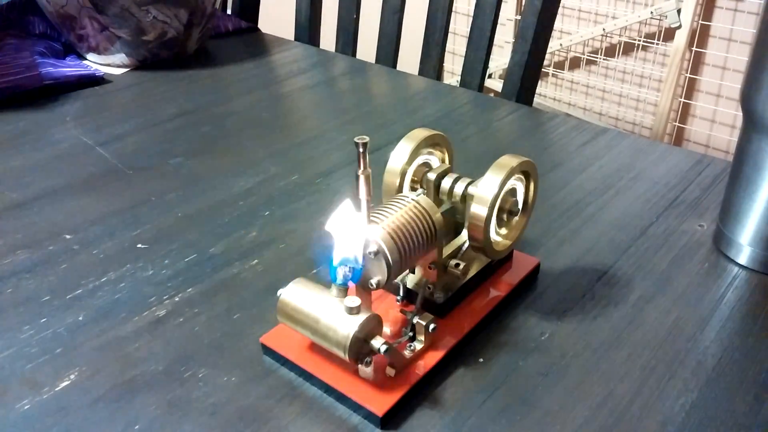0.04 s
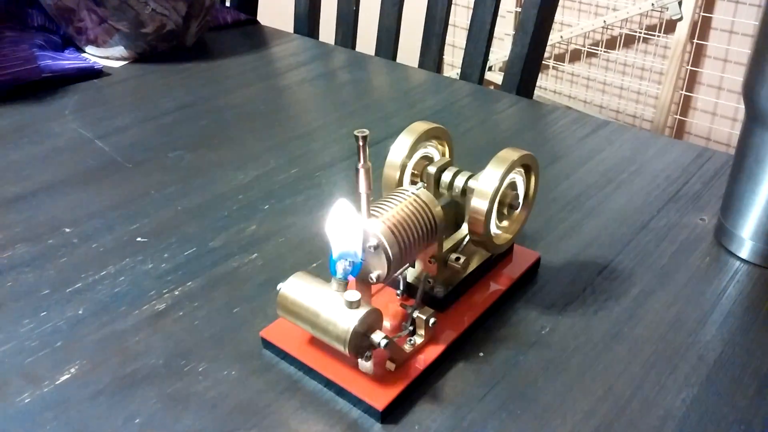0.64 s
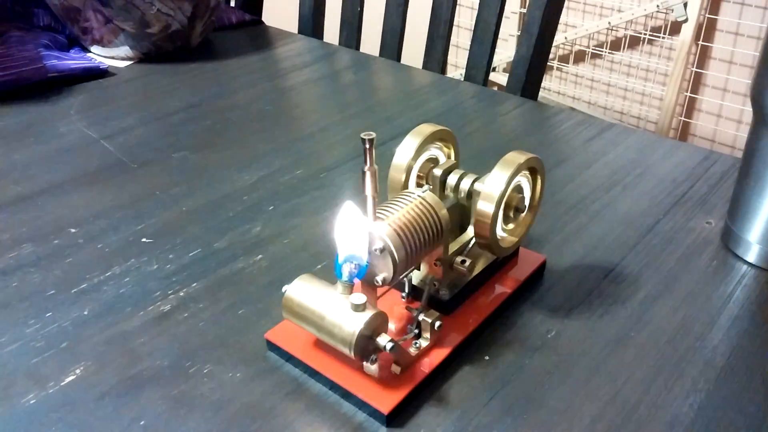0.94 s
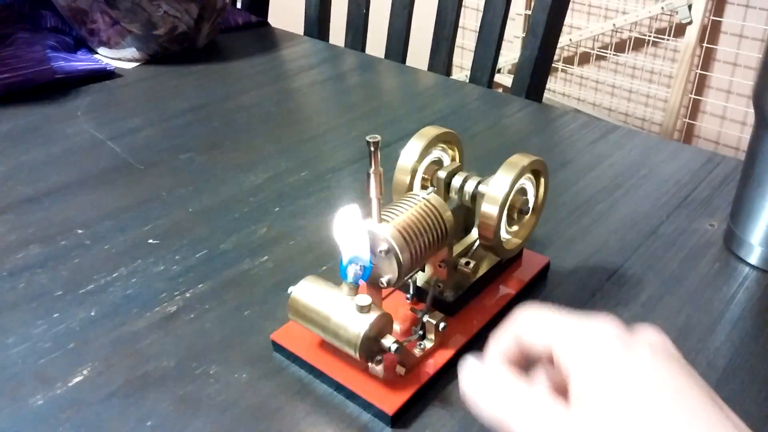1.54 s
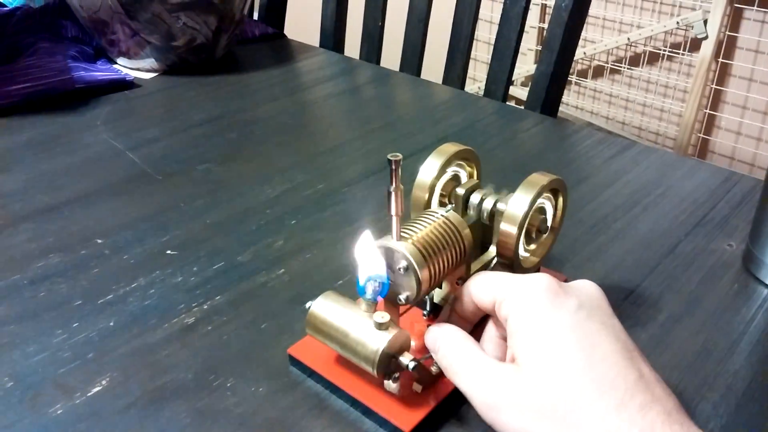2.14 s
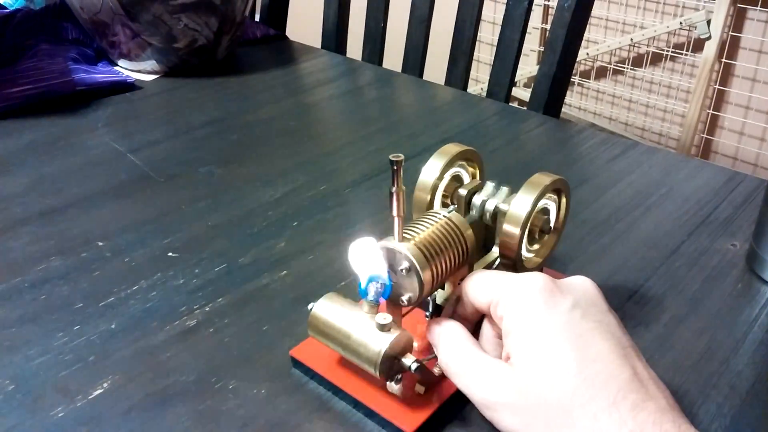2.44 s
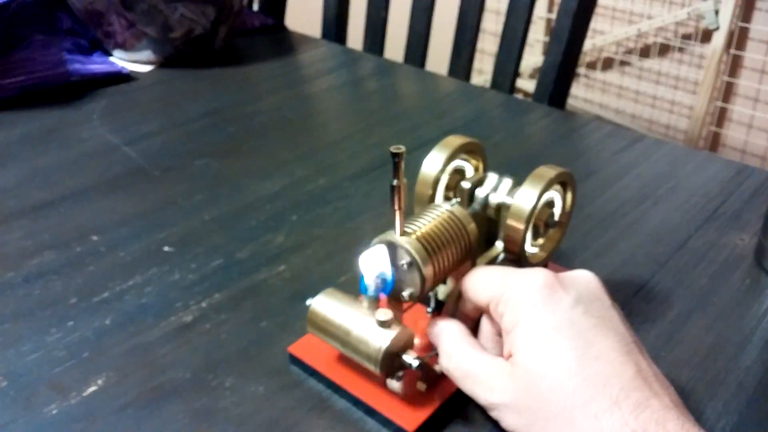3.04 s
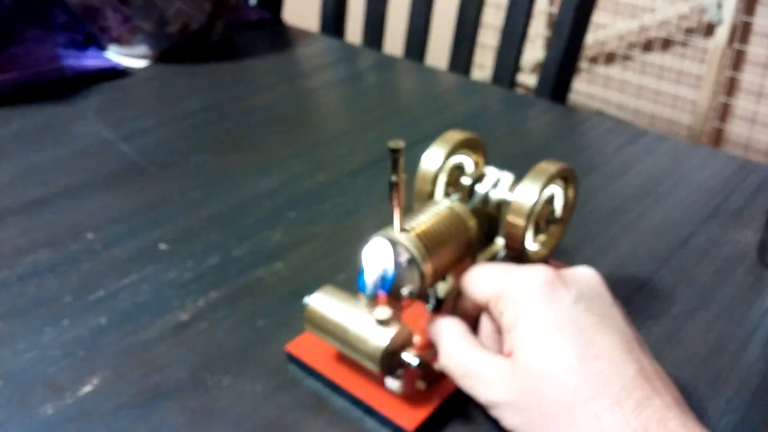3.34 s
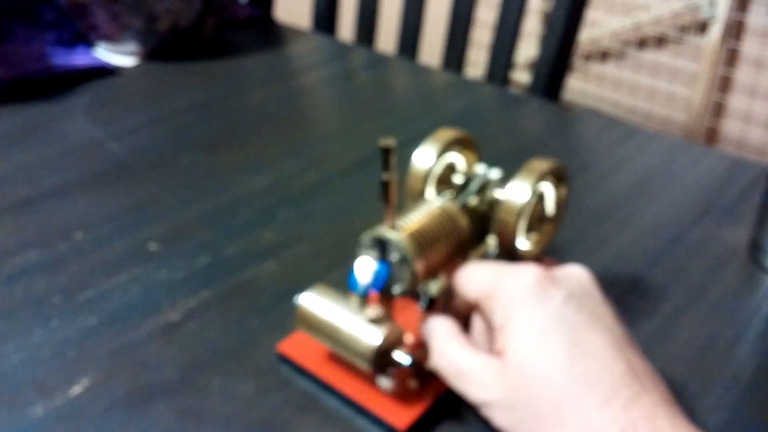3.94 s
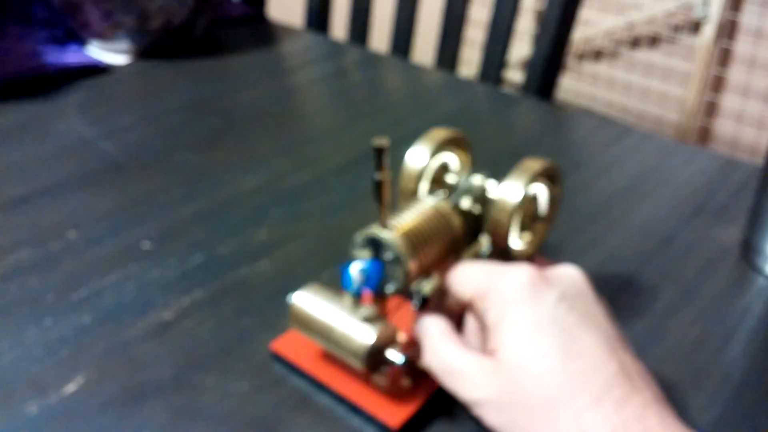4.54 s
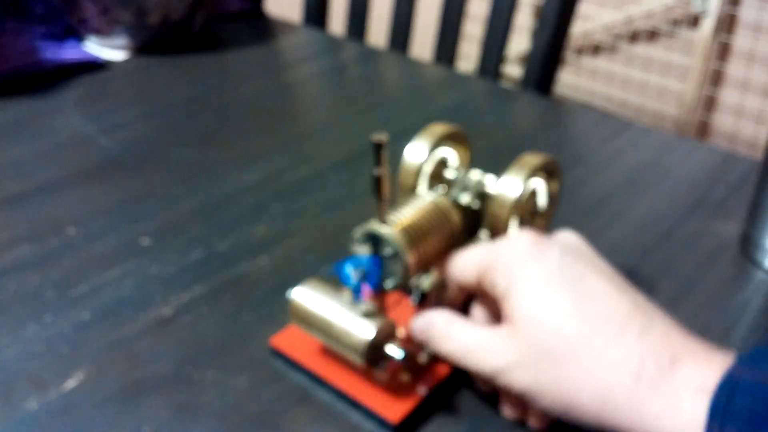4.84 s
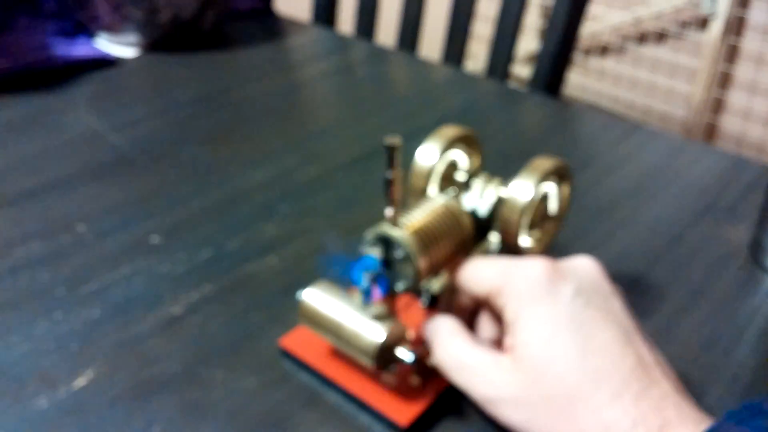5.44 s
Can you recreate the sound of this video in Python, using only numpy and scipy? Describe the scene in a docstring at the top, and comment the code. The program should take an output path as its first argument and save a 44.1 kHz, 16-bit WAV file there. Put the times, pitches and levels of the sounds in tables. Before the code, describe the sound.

A small flame-driven model engine runs close by on a wooden table for the whole clip, nearly six seconds, holding about six and a half turns a second. Each turn opens with a light knock, followed by faint piston ticks and clinking links, a very short, high, falling squeak, and a rasp of gas ending in a shutter click. The knocks make the base and table resonate in a low hum, while the brass cylinder adds a slight metallic ring. Harder clacks stand out at about 0.3, 2.0, 3.5 and 5.4 seconds. Sharper squeaks come near 0.2 and 0.8 seconds, cluster between 1.6 and 2.4 and between 3.0 and 3.6, and return around 4.0, 4.7 and 5.4. The room is small, with little reverberation. Faint room air lies underneath, with a barely audible thin, high whine that fades by 2 seconds and returns at 4.

```python
"""In a small room, on a wooden table, a model flame-eater engine runs close by at about 6.5 turns a second.
Each turn opens with a knock that excites the normal modes of base, table and brass cylinder. The piston
slides with faint ticks while loose links clink; stick-slip friction gives a short falling squeak; then
a rasp of gas ends in the click of the flame shutter. Faint room air and a thin whine lie underneath,
and an expander turns the quiet gaps down."""
import sys
import numpy as np
from scipy import signal
from scipy.fft import rfft, irfft, next_fast_len
from scipy.io import wavfile
from scipy.ndimage import uniform_filter1d

SR = 44100
rng = np.random.default_rng(int(sys.argv[2]) if len(sys.argv) > 2 else 0)


def file_out(sig):
    """Save sig as 16-bit WAV at sys.argv[1]."""
    # one column per channel
    cols = np.atleast_2d(sig).T
    # limit, then scale
    lim = np.clip(cols, -1, 1)
    pcm = np.round(lim * 32767).astype(np.int16)
    wavfile.write(sys.argv[1], SR, pcm)


N = 250701
RING_TIME = np.arange(SR // 2) / SR  # time axis of an impulse response, in seconds


def undb(db):
    """Amplitude grows tenfold for every 20 dB."""
    return 10 ** (np.asarray(db) / 20)


def along(times, curve):
    """Linear interpolation between (time, value) points."""
    return np.interp(times, *np.transpose(curve))


def noise(size=N):
    """White noise, uncorrelated between left and right."""
    return rng.standard_normal((2, size))


def gritty(spread_db, grain_hz):
    """Random amplitude modulation: noise whose strength jumps from grain to grain."""
    grain = (np.arange(N) * grain_hz / SR).astype(int)
    gain = undb(spread_db * rng.standard_normal(N)[grain])
    return noise() * gain / np.sqrt(np.mean(gain ** 2))


def colour(x, points):
    """Spectral shaping by a curve of (Hz, dB) points."""
    hz, db = np.transpose(points)
    size = next_fast_len(N + 8192)
    bins_hz = np.maximum(np.fft.rfftfreq(size, 1 / SR), 1)
    gain = undb(np.interp(np.log(bins_hz), np.log(hz), db))
    return irfft(rfft(x, size) * gain, size)[..., :N]


def cut(x, hz, kind, order=2):
    """A maximally flat low-pass or high-pass filter."""
    return signal.sosfilt(signal.butter(order, hz, kind, fs=SR, output="sos"), x)


def blows(times, db):
    """Brief impacts idealised as impulses."""
    out = np.zeros(N)
    np.add.at(out, np.clip(np.round(times * SR).astype(int), 0, N - 1), undb(db))
    return out


def ring(x, response):
    """A linear system convolves its input with its impulse response."""
    return signal.fftconvolve(np.atleast_2d(x), np.atleast_2d(response), axes=1)[:, :N]


def fade(t60_s):
    """Damping: an exponential decay that loses 60 dB in the time T60."""
    return np.exp(-np.log(1000) * RING_TIME / t60_s)


def swell(rise_s, fall_s):
    """A raised-cosine rise and fall."""
    t = np.arange(int((rise_s + fall_s) * SR)) / SR
    return np.sin(np.pi / 2 * np.interp(t, [0, rise_s, rise_s + fall_s], [0, 1, 0])) ** 2


# Spectrum of the room air. Each row: frequency in Hz, relative level in dB.
AIR_SPECTRUM = [(20, 2.5), (60, -19), (120, -1), (300, -14), (1000, -13), (3000, -3.5), (10000, -60),
                (16000, -73)]
# Course of the whine. Each row: time in seconds, frequency in Hz, level in dB.
WHINE_COURSE = [(0, 10430, -70.5), (1.6, 10370, -76), (2.0, 9900, -87), (3.92, 10470, -99),
                (4.02, 10400, -69), (5.68, 10570, -74)]


def background(waver_hz=25):
    """Room air is broadband noise; a thin whine wavers by random frequency modulation."""
    times, *columns = np.transpose(WHINE_COURSE)
    hz, db = (np.interp(np.arange(N) / SR, times, column) for column in columns)
    mid, side = colour(noise(), AIR_SPECTRUM)
    air = mid + undb(-4.5) * side * np.array([[1], [-1]])
    waver = cut(rng.standard_normal(N), 30, "low")
    whine = undb(db) * np.sin(2 * np.pi * np.cumsum(hz + waver_hz * waver / waver.std()) / SR)
    return undb(-47) * air + whine


# Speed of the flywheels. Each row: time in seconds, speed in turns per second.
FLYWHEEL_SPEED = [(0.0, 6.643), (0.7, 6.563), (1.6, 6.632), (2.0, 6.623), (2.45, 6.367), (2.75, 6.608),
                  (3.35, 6.559), (3.6, 6.423), (4.0, 6.499), (4.5, 6.485), (5.0, 6.433), (5.68, 6.501)]
SQUEAK_TURN, SHUTTER_TURN = 0.417, 0.603  # fractions of a turn after the knock


def turn_times(share=0, first_knock_s=0.016):
    """Angle is the integral of speed: the times at which the crank passes a given share of each turn."""
    t = np.arange(N) / SR
    turns = np.cumsum(along(t, FLYWHEEL_SPEED)) / SR
    count = int(turns[-1] - SHUTTER_TURN) + 1
    return first_knock_s + np.interp(np.arange(count) + share, turns, t)


# Knocks harder or softer than usual. Each row: time in seconds, extra force in dB.
UNEVEN_KNOCKS = [(0.317, 9), (0.622, -0.5), (0.774, 3.5), (0.926, -8), (1.682, -10.5), (1.834, 1.5),
                 (1.984, 13), (2.136, 6.5), (3.057, 6), (3.362, 4.5), (3.514, 12), (3.67, -4), (4.134, -10),
                 (4.751, -16), (5.061, -8), (5.216, -8), (5.371, 7)]


def strokes(scatter_db=0.1):
    """Quasi-periodic excitation, one knock a turn. Returns times and extra force in dB."""
    times = turn_times()
    force_db = -scatter_db * rng.standard_normal(len(times))
    for when, db in UNEVEN_KNOCKS:
        force_db[np.argmin(np.abs(times - when))] = db
    return times, force_db


# Thump of a blow on the base. Each row: time in seconds, level in dB at ordinary force.
THUMP_LEVEL = [(0, -39), (1.35, -39), (1.55, -39), (2.0, -39.5), (2.9, -39), (3.1, -38.5), (3.7, -39.5),
               (4.3, -37), (4.6, -41), (5.05, -40.5), (5.37, -37), (5.68, -38)]
# Spectrum of metal ticking and rubbing. Each row: frequency in Hz, gain in dB.
METAL_SPECTRUM = [(300, 5), (1100, 13.5), (1800, -9.5), (2700, 19), (3300, 12), (4200, 2), (6500, 3),
                  (10000, -0.5), (12000, -6), (16000, -7.5)]


def knocks(times, force_db, stir_db, split_hz=540, jolt_hz=880, heave_hz=340):
    """Impact: soft contact drives low modes, hard contact high ones. Returns sound and push on the base."""
    hard = blows(times, -40 + force_db)
    soft = blows(times, along(times, THUMP_LEVEL) + 0.23 * force_db)
    push = cut(soft, split_hz, "low", order=4) + undb(-6.5) * cut(hard, split_hz, "high", order=4)
    # the clack is a tight jolt with a short heave under it
    jolt = undb(4) * fade(0.0095) * np.sin(2 * np.pi * jolt_hz * RING_TIME)
    heave = undb(-4) * fade(0.03) * np.sin(2 * np.pi * heave_hz * RING_TIME)
    clack = cut(cut(ring(hard, jolt + heave), 213, "high"), 1460, "low", order=4)
    tick_envelope = ring(blows(times, -54.5 + 2 * stir_db), fade(0.057))
    return clack + colour(noise() * tick_envelope, METAL_SPECTRUM), push


# Modes of the base on the table. Each row: frequency in Hz, relative level in dB, T60 in seconds.
BASE_MODES = [(76, -12.5, 0.12), (108.17, -8, 0.49), (126.14, -6, 0.32), (172.4, -12, 0.23),
              (220.5, -10.5, 0.14), (241.3, -24.5, 0.62), (305.4, 5, 0.041), (357.5, -1, 0.11),
              (361, -2.5, 0.25), (379.3, -7, 0.048), (448, -23, 0.45), (685, -24.5, 0.052),
              (702, -4, 0.015), (814, -5.5, 0.061), (920, -0.5, 0.0056), (1000, -13.5, 0.048),
              (1058, -8.5, 0.17), (1071, -4, 0.079), (1127, -5, 0.016), (1464, -26.5, 0.33)]


def base_and_table(push, times, build_cycles=0.41, scatter_db=3):
    """Modal superposition: each mode builds up in about a cycle and takes a varying share of each blow."""
    out = 0
    for k, (hz, db, t60) in enumerate(BASE_MODES):
        build_up = 1 - np.exp(-RING_TIME * hz / build_cycles)
        mode = fade(t60) * np.sin(2 * np.pi * hz * RING_TIME) * build_up
        share_db = scatter_db * np.interp(np.arange(N) / SR, times, rng.standard_normal(len(times)))
        out = out + (-1) ** k * ring(push * undb(db + share_db), mode)
    return out


# Modes of the cylinder and its fins. Each row: frequency in Hz, gain at resonance in dB, T60 in seconds.
CYLINDER_MODES = [(1734, -4.5, 0.047), (2110, 4.5, 0.033), (2279.6, 14.5, 0.32), (2580, -25, 0.071),
                  (3262, 2, 0.015), (4052, 8, 0.08), (4970, 1.5, 0.02), (5950, -27, 0.042),
                  (5935, -1, 0.018), (6690, -0.5, 0.027)]


def brass_cylinder(x):
    """Resonance: whatever rubs or ticks also rings the cylinder, which adds to the direct sound."""
    response = sum(undb(db) * 2 * fade(t60) / fade(t60).sum() * np.cos(2 * np.pi * hz * RING_TIME)
                   for hz, db, t60 in CYLINDER_MODES)
    return x + ring(x, response)


# Play in the linkage. Each row: delay after the knock in seconds, relative level in dB.
LINKAGE_RATTLE = [(.021, -64), (.042, -61)]


def piston(times, stir_db, slide_db=-62, slack_s=0.0025, scatter_db=1.46):
    """Friction noise: the piston slides after each knock, and backlash rattles the linkage twice."""
    slide = ring(blows(times, slide_db + stir_db), swell(0.0056, 0.15))
    late, force = rng.standard_normal((len(times), len(LINKAGE_RATTLE), 2)).T
    contacts = sum(blows(times + delay + slack_s * late[k], db + scatter_db * force[k])
                   for k, (delay, db) in enumerate(LINKAGE_RATTLE))
    rattle = ring(contacts, swell(0.0046, 0.0019))
    return colour(gritty(spread_db=3.8, grain_hz=600) * (slide + rattle), METAL_SPECTRUM)


# Modes of the small links. Each row: frequency in Hz, relative level in dB, T60 in seconds.
LINK_MODES = [(3700, 9, 0.032), (5570, 7, 0.025), (6000, -25, 0.025), (7700, -11, 0.019)]


def clinks(times, stir_db, count=2, stroke_s=0.055, level_db=-62, spread_db=4):
    """Free vibration: loose links collide at random moments of a stroke, each clink ringing one mode."""
    attack = np.minimum(RING_TIME / 0.00091, 1)
    out = 0
    for hz, db, t60 in LINK_MODES:
        hits = times[:, None] + stroke_s * rng.random((len(times), count))
        force_db = level_db + db + stir_db[:, None] + spread_db * rng.standard_normal(hits.shape)
        # each mode radiates its own way, so left and right differ in phase
        mode = fade(t60) * np.sin(2 * np.pi * (hz * RING_TIME + rng.random((2, 1)))) * attack
        out = out + ring(blows(hits.ravel(), force_db.ravel()), mode)
    return out


# The light squeaks of ordinary turns. Each row: time in seconds, relative level in dB.
LIGHT_SQUEAK_LEVEL = [(0, -32), (0.5, -26.5), (1.0, -28.5), (1.45, -25), (1.75, -32), (2.5, -25),
                      (2.67, -36), (2.85, -26.5), (4.8, -29), (5.0, -35), (5.599, -24)]
# The loud squeaks. Each row: start in seconds, relative level in dB, decay time in seconds, starting
# pitch in Hz, second grip's relative level in dB, roughness from 0 to 1, second grip's delay in seconds.
LOUD_SQUEAKS = [(0.2251, -20, 0.0059, 3047, -39, 0.55, 0.011),
                (0.8362, -20.5, 0.0035, 2970, -34.5, 0.4, .02),
                (1.1412, -27, 0.0048, 2924, -31.5, 0.23, 0.0057),
                (1.5938, -22, 0.0047, 2993, -38, 0, 0.012), (1.8925, -14.5, 0.011, 3350, -46, 0.14, .007),
                (2.0471, -23, 0.004, 2853, -26, 0.63, 0.012),
                (2.2006, -14.5, 0.0013, 3093, -27, 0.15, .0065),
                (2.353, -22.5, 0.0029, 3080, -32, 0.11, 0.011), (2.968, -16, 0.0031, 2977, -47, 0.08, .011),
                (3.2699, -24, 0.0048, 3116, -30.5, 0.39, .011),
                (3.421, -21.5, 0.0053, 3158, -14.5, 0.18, .011),
                (3.5781, -18, 0.0024, 2833, -28, 0.29, 0.0056),
                (4.04, -22.5, 0.011, 2980, -31.5, 0.44, 0.013),
                (4.5034, -29, 0.019, 3137, -36.5, 0.45, 0.028),
                (4.6556, -20, 0.0076, 2990, -40.5, 0.19, .018),
                (4.8142, -30, 0.011, 3097, -48, 0.28, 0.022),
                (5.281, -28.5, 0.0056, 2916, -29, 0.46, 0.012),
                (5.4331, -24.5, 0.0037, 3237, -24, 0.27, 0.0099)]


def grips(slack_s=0.001, scatter_db=1.6, pitch_spread=0.0274, length_spread=0.43, roughness=0.26):
    """Friction grips unevenly, mostly lightly. Returns one row a turn, laid out as in LOUD_SQUEAKS."""
    times = turn_times(SQUEAK_TURN)
    late, share, length, pitch, wait = rng.standard_normal((5, len(times)))
    db = along(times, LIGHT_SQUEAK_LEVEL)
    # what the first grip does not release is left for the second
    first_db, second_db = db + scatter_db * share, db - 2.5 - scatter_db * share
    decay_s = 0.00053 * np.exp(length_spread * length)
    start_hz = 3010 * (1 + pitch_spread * pitch)
    delay_s = 0.0069 * np.exp(length_spread * wait)
    rows = np.column_stack([times + slack_s * late, first_db, decay_s, start_hz,
                            second_db, np.full(len(times), roughness), delay_s])
    for squeak in LOUD_SQUEAKS:
        rows[np.argmin(np.abs(times - squeak[0]))] = squeak
    return rows


def squeaks(rows, glide_s=0.02192, rise_s=0.0033, peak_s=0.0025, rough_hz=380, radiate_hz=2120):
    """Stick-slip: a dry part grips twice, its pitch sinking as it slows. Returns sound and push."""
    out = np.zeros(N + SR)
    t = np.arange(-SR // 200, SR // 20) / SR
    attack = np.sin(np.pi / 2 * np.clip(1 + (t - peak_s) / rise_s, 0, 1)) ** 2
    glide = (1 + np.exp(-np.maximum(t, 0) / glide_s)) / 2
    for start, first_db, decay_s, start_hz, second_db, roughness, delay_s in rows:
        first = undb(first_db) * attack * np.exp(-np.maximum(t - peak_s, 0) / decay_s)
        second = undb(second_db) * np.exp(-0.5 * ((t - delay_s) / 0.0031) ** 2)
        phase = 2 * np.pi * np.cumsum(start_hz * glide) / SR
        # uneven slip modulates amplitude and phase, and lets a higher and a lower note break through
        uneven = cut(rng.standard_normal((3, len(t))), rough_hz, "low", order=4)
        strength, lag, upper = roughness * uneven / uneven.std()
        # so small a part radiates poorly at the bottom of its glide
        tone = cut((1 + strength) * np.sin(phase + lag), radiate_hz, "high", order=10)
        tone += undb(-6) * upper * np.sin(1.21 * phase) + undb(-14) * roughness * np.sin(0.41 * phase)
        out[int((start + t[0]) * SR):][:len(t)] += (first + second) * tone
    push = cut(rng.standard_normal(N) * np.abs(out[:N]), 770, "high", order=4)
    return undb(-3.5) * out[:N], undb(-44) * push


# Spectra of the gas rasp and the shutter's click. Each row: frequency in Hz, gain in dB.
GAS_SPECTRUM = [(200, -11), (550, -2.5), (750, -2), (1150, 13.5), (1400, 2), (1700, 11.5), (2000, -10),
                (3000, 11), (4200, -3.5), (4900, 3.5), (5600, 1), (9500, -3.5), (12000, -10.5),
                (16000, -13)]
CLICK_SPECTRUM = [(500, -7.5), (3000, -5), (5000, -10), (7000, -3.5), (9500, -3.5), (12000, -9),
                  (16000, -25.5)]
# Strength of the click. Each row: time in seconds, relative level in dB.
SHUTTER_LEVEL = [(0.1, -28), (0.6, -29.5), (1.2, -37.5), (1.5, -29.5), (2.1, -24.5), (2.5, -34),
                 (3.35, -34), (4.1, -25), (4.85, -40.5), (5.68, -31)]


def shutter(drag_db, gas_db=-44.5, gas_lead_s=0.017, bump_db=-6.5, bump_lead_s=0.003765):
    """Flow noise swells until the shutter's impact, more after a loud squeak. Returns sound and push."""
    times = turn_times(SHUTTER_TURN)
    click_scatter, flow_scatter = rng.standard_normal((len(times), 2)).T
    click_db = along(times, SHUTTER_LEVEL) - 0.06 * drag_db + 3.5 * click_scatter
    flow_db = 0.28 * drag_db + 1.2 * flow_scatter
    flow = ring(blows(times - gas_lead_s, gas_db + flow_db), swell(gas_lead_s, 0.029))
    gas = colour(gritty(spread_db=4.63, grain_hz=900) * flow, GAS_SPECTRUM)
    click = colour(noise() * ring(blows(times, click_db), fade(0.0094)), CLICK_SPECTRUM)
    push = blows(times - bump_lead_s, along(times, THUMP_LEVEL) + bump_db + flow_db)
    return gas + click, push


def room(x, early_db=-9, late_db=-10, early_t60_s=0.037, late_t60_s=0.26):
    """Reverberation: early reflections from the table and things on it, then the room's diffuse tail."""
    t = RING_TIME
    # small things reflect little bass
    early = cut(noise(len(t)) * fade(early_t60_s) * (t > 0.002), 600, "high")
    late = noise(len(t)) * fade(late_t60_s) * np.clip(t / 0.01 - 0.5, 0, 1)
    response = sum(undb(db) * part / np.sqrt(np.sum(part ** 2) / 2)
                   for part, db in ((early, early_db), (late, late_db)))
    mid, side = ring(x.mean(axis=0), response)
    # left and right receive the same bass
    side = undb(-0.5) * cut(side, 710, "high", order=1)
    return x + cut(mid, 89, "high", order=1) + side * np.array([[1], [-1]])


def scene(usual_squeak_db=-23):
    """Airborne and structure-borne sound add: knock, squeak and shutter also push on the base."""
    times, force_db = strokes()
    squeak_rows = grips()
    # only a hard knock stirs the metal parts much more than usual
    stir_db = 0.4257 * np.logaddexp(0, force_db)
    # each turn's louder grip, relative to a usual squeak
    drag_db = np.maximum(squeak_rows[:, 1], squeak_rows[:, 4]) - usual_squeak_db
    knock, knock_push = knocks(times, force_db, stir_db)
    squeak, squeak_push = squeaks(squeak_rows)
    gas, shutter_push = shutter(drag_db)
    squeak = np.array([squeak, np.roll(squeak, 3)])  # arrives three samples sooner on the left
    metal = brass_cylinder(knock + piston(times, stir_db) + clinks(times, stir_db) + squeak + gas)
    base = base_and_table(knock_push + squeak_push + shutter_push, times)
    return room(metal + base) + background()


def expander(x, threshold_db, slope=3.33, depth_db=-13, window_s=0.0064):
    """Downward expansion: the gain falls when the short-time level sinks under a threshold."""
    power = uniform_filter1d(np.mean(x ** 2, axis=0), int(window_s * SR))
    under_db = np.minimum(10 * np.log10(np.abs(power) + 1e-18) - threshold_db, 0)
    return x * uniform_filter1d(undb(np.maximum(slope * under_db, depth_db)), size=128)


# Imbalance of the two microphone ports. Each row: frequency in Hz, left minus right in dB.
PORT_BALANCE = [(60, 3.5), (110, 0.5), (200, 2), (380, -2.5), (700, 7), (1290, -0.5), (2380, 10), (4400, 2),
                (8120, 2.5), (15000, -2)]
# Bands of the expander. Each row: lower edge in Hz, threshold in dB.
EXPANDER_BANDS = [(0, -55), (550, -61.5), (1900, -49.5), (4000, -62)]


def record(dry, top_hz=15950):
    """Each port has its own frequency response; multiband expansion and a steep low-pass follow."""
    ports = np.array([colour(x, [(hz, sign * db / 2) for hz, db in PORT_BALANCE])
                      for x, sign in zip(dry, (1, -1))])
    crossovers = [signal.butter(4, hz, "high", fs=SR, output="sos") for hz, _ in EXPANDER_BANDS[1:]]
    above = [ports] + [signal.sosfiltfilt(sos, ports) for sos in crossovers] + [0]
    out = sum(expander(above[k] - above[k + 1], db) for k, (_, db) in enumerate(EXPANDER_BANDS))
    return signal.sosfilt(signal.ellip(10, 0.2, 70, top_hz, fs=SR, output="sos"), out)


dry = scene()
out = record(dry)
file_out(out)
```